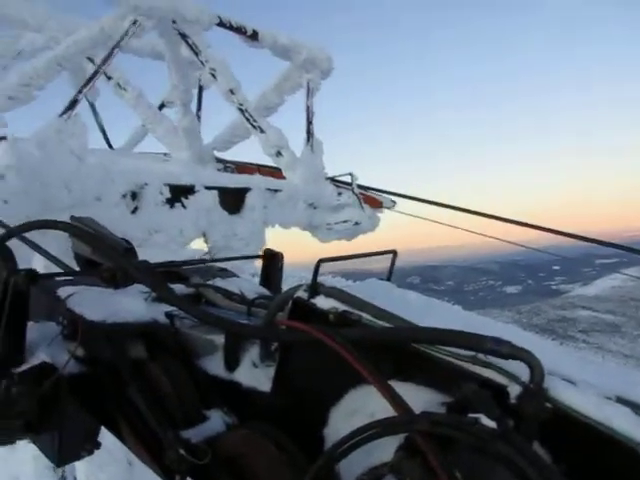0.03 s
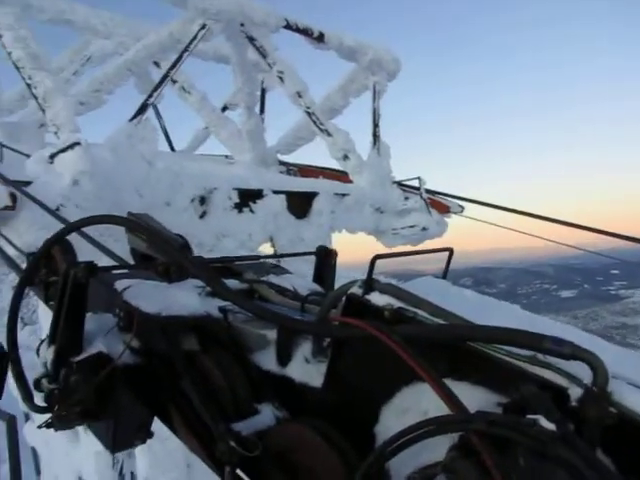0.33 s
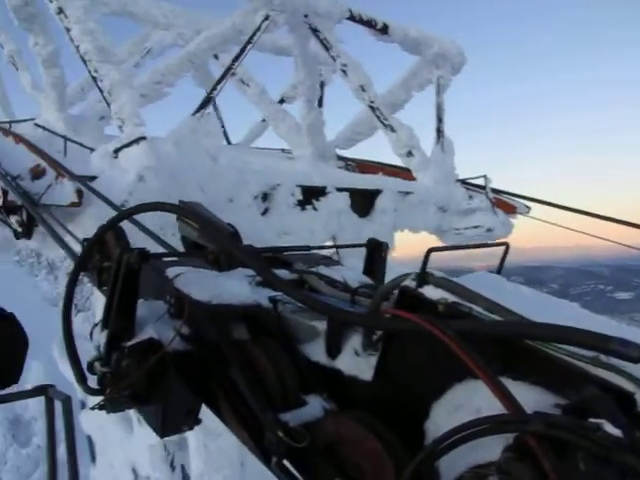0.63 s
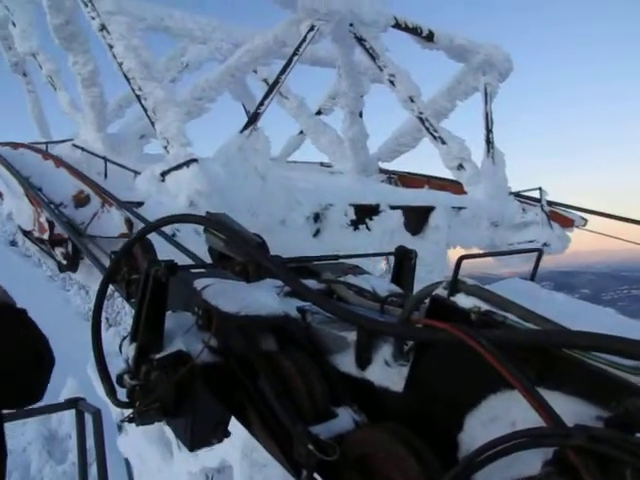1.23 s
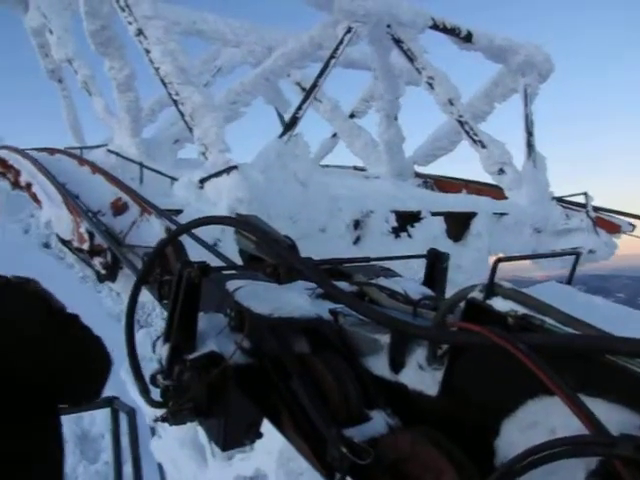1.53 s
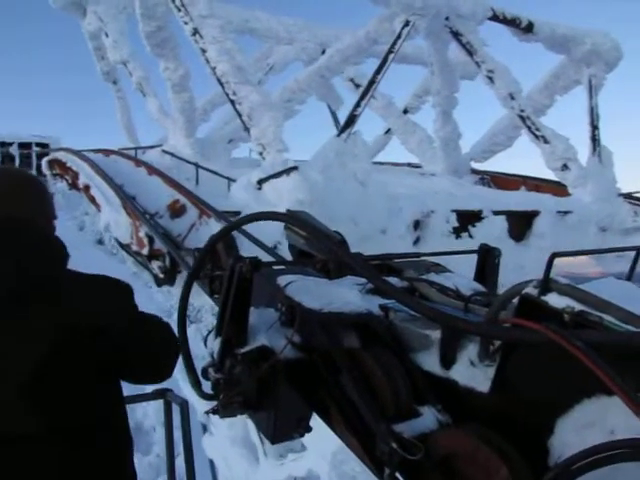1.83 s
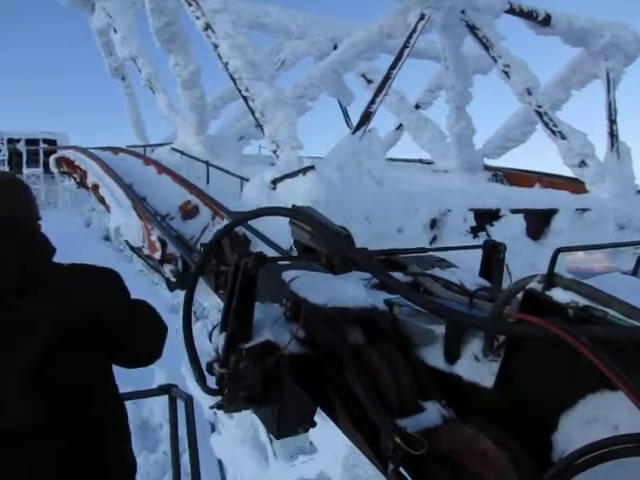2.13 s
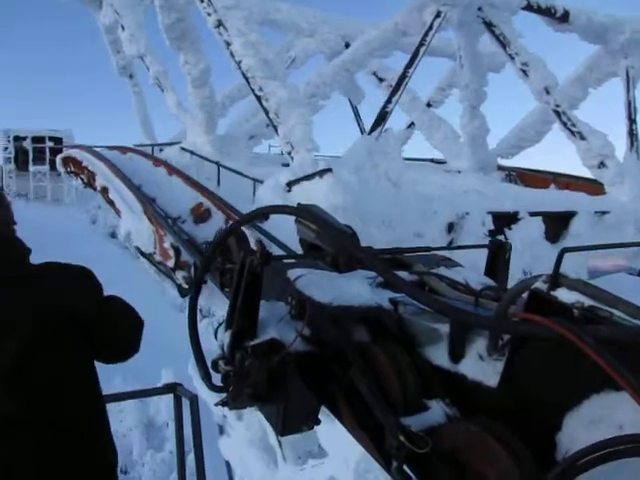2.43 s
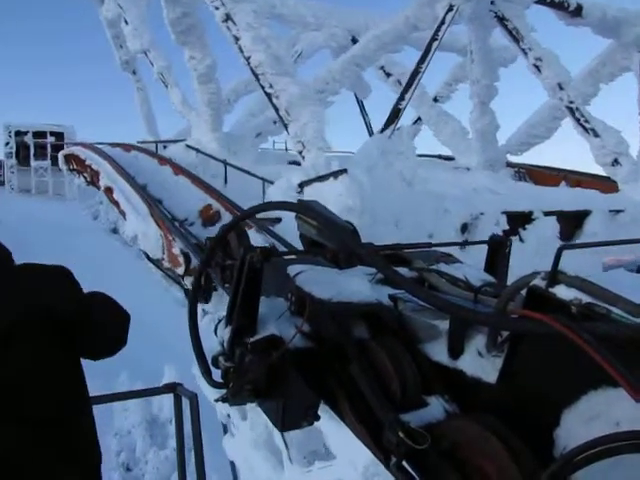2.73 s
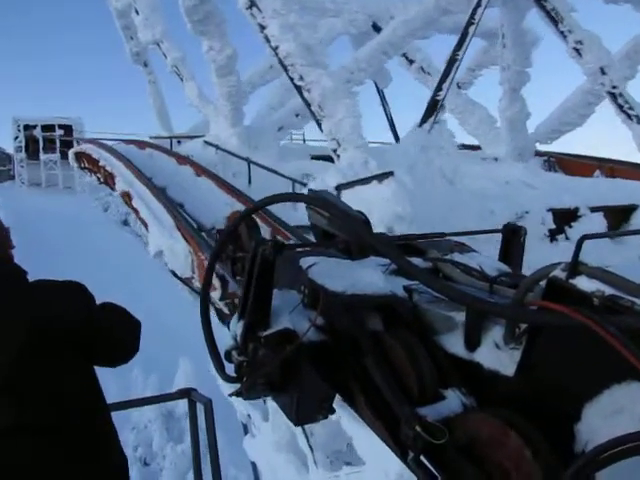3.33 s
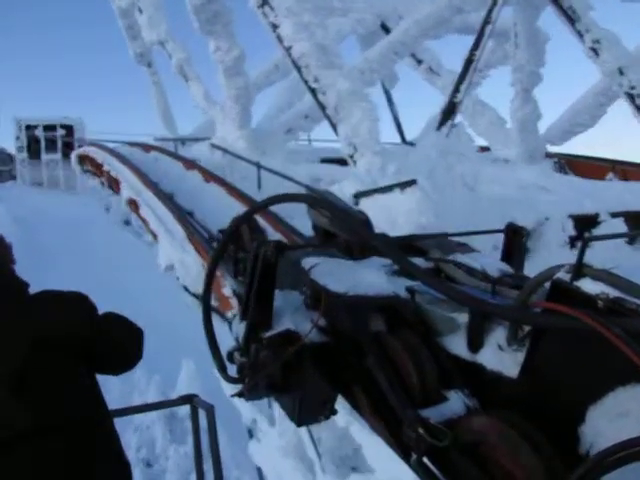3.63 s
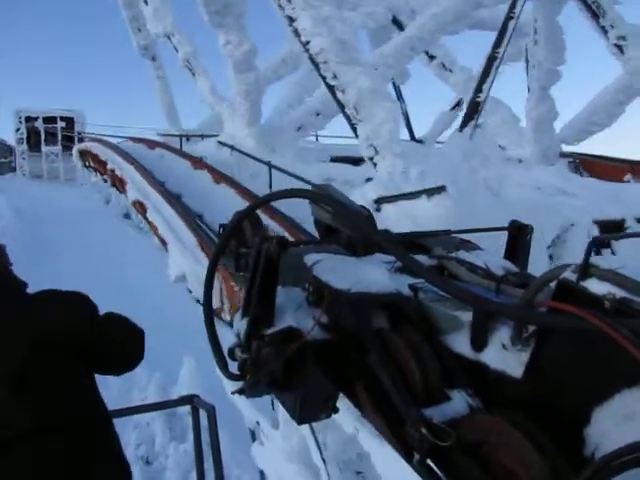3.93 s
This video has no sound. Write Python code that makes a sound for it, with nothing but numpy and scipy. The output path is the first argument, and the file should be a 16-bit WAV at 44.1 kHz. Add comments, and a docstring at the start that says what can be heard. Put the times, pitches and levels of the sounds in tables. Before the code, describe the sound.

Frozen cable car machinery squeals in harsh repeated strokes over low rumbling wind.

```python
"""Frozen cable car squealing in the wind

Frozen machinery squeals in repeated strokes: steel sticks and slips, and each slip rings the same
metal body. Fast slipping whistles cleanly; slow slipping under load turns into a rasp. Mountain wind
rumbles and thumps on the two microphone openings. Behind it are a fine sizzle, an icy hiss, brief
scrapes, steady air and a faint whine."""
import sys
import numpy as np
from scipy import signal
from scipy.fft import rfft, irfft
from scipy.io import wavfile
from scipy.ndimage import uniform_filter1d, minimum_filter1d

SR = 44100
rng = np.random.default_rng(int(sys.argv[2]) if len(sys.argv) > 2 else 0)


def file_out(sig):
    """Save sig as 16-bit WAV at sys.argv[1]."""
    # one column per channel
    cols = np.atleast_2d(sig).T
    # limit, then scale
    lim = np.clip(cols, -1, 1)
    pcm = np.round(lim * 32767).astype(np.int16)
    wavfile.write(sys.argv[1], SR, pcm)


N = 176400
T = np.arange(N) / SR
FREQ = np.arange(N // 2 + 1) * SR / N

# How the steel slips, one list for each squeal: time_s, slip_rate_hz, force_db
SQUEAL_STROKES = [
    [(0.002, 3600, -24), (0.022, 2116, -24.5), (0.027, 1384, -19.5), (0.043, 1530, -21.5),
     (0.07, 1503, -19.5), (0.08, 1626, -26), (0.095, 1456, -20), (0.108, 1540, -28), (0.118, 1844, -23),
     (0.133, 1630, -25), (0.141, 1284, -20.5), (0.155, 1346, -22), (0.162, 1190, -24), (0.18, 1490, -19.5),
     (0.192, 1084, -21), (0.2, 1490, -21), (0.213, 1240, -21), (0.224, 1280, -24), (0.234, 1720, -36)],
    [(0.332, 2870, -32), (0.346, 2105, -34), (0.359, 2240, -32), (0.371, 1295, -32.5), (0.384, 1620, -32)],
    [(0.393, 1800, -31), (0.404, 1256, -25.5), (0.42, 1310, -29.5), (0.43, 1040, -29.5), (0.45, 1780, -39)],
    [(0.463, 3510, -41.5), (0.481, 1967, -22), (0.498, 2116, -25.5), (0.523, 1736, -22), (0.543, 2150, -24),
     (0.563, 1760, -22.5), (0.569, 1470, -17.5), (0.583, 1357, -21.5), (0.587, 1955, -25),
     (0.602, 2000, -24.5), (0.62, 3000, -34)],
    [(0.908, 2847, -30), (0.925, 2140, -22), (0.938, 1147, -18.5), (0.95, 1023, -21), (0.963, 1097, -24),
     (0.98, 1065, -20), (1.01, 1210, -22), (1.022, 1116, -20.5), (1.045, 1126, -23), (1.058, 1334, -22.5),
     (1.08, 1165, -20), (1.087, 887, -23), (1.122, 910, -19), (1.133, 1090, -21.5), (1.146, 1057, -22),
     (1.15, 859, -23), (1.159, 788, -15), (1.163, 1105, -19.5), (1.18, 1060, -25), (1.184, 911, -17.5),
     (1.197, 963, -26.5), (1.215, 1607, -38)],
    [(1.34, 1974, -34), (1.362, 1556, -33), (1.383, 1454, -30.5), (1.398, 940, -31.5), (1.41, 1245, -30)],
    [(1.428, 1356, -31), (1.448, 852, -27.5), (1.462, 787, -21.5), (1.479, 722, -23.5), (1.489, 1017, -26),
     (1.508, 1780, -34)],
    [(1.538, 2130, -36.5), (1.558, 1293, -25), (1.586, 1337, -25.5), (1.623, 1061, -20.5),
     (1.657, 1370, -29.5), (1.677, 1081, -21.5), (1.695, 959, -25.5), (1.718, 835, -19),
     (1.742, 908, -21.5), (1.749, 1056, -25), (1.763, 1810, -30)],
    [(2.208, 1570, -38), (2.22, 1807, -36), (2.232, 1537, -25.5), (2.24, 1178, -26), (2.254, 1055, -23),
     (2.27, 890, -22.5), (2.287, 750, -21.5), (2.318, 706, -22.5), (2.365, 792, -23), (2.4, 770, -23),
     (2.43, 903, -25), (2.455, 798, -20.5), (2.47, 646, -21.5), (2.49, 717, -22), (2.51, 651, -19),
     (2.532, 703, -20), (2.562, 610, -20), (2.568, 850, -20), (2.595, 721, -21), (2.61, 792, -28),
     (2.63, 1285, -36)],
    [(2.765, 2360, -41), (2.785, 1625, -34), (2.806, 1264, -32.5), (2.82, 1353, -30), (2.836, 822, -33),
     (2.853, 1080, -30)],
    [(2.866, 1258, -29.5), (2.888, 802, -25.5), (2.906, 771, -21), (2.92, 726, -23.5), (2.93, 1180, -27),
     (2.95, 1650, -39)],
    [(2.976, 2290, -37), (2.997, 1344, -23.5), (3.021, 1515, -25.5), (3.035, 1364, -26), (3.056, 1211, -24),
     (3.085, 1642, -23.5), (3.104, 1298, -26.5), (3.118, 1185, -17.5), (3.138, 1038, -21),
     (3.16, 1170, -22), (3.178, 2175, -41)],
    [(3.533, 2266, -42), (3.543, 2415, -26), (3.552, 2120, -28), (3.558, 1690, -21), (3.57, 1057, -24.5),
     (3.585, 946, -17.5), (3.591, 1160, -23), (3.597, 1001, -25), (3.62, 975, -22), (3.655, 1040, -25),
     (3.677, 937, -26), (3.707, 1144, -22), (3.731, 960, -25), (3.736, 820, -19), (3.76, 914, -21.5),
     (3.793, 763, -21), (3.815, 870, -19), (3.821, 1106, -22), (3.833, 1091, -22), (3.838, 820, -19.5),
     (3.858, 1074, -31)],
]
def squeals():
    """The slips ring the steel, the contact grinds, and the frame scatters the ringing."""
    pulses, force = sum(np.array(stick_slip(stroke)) for stroke in SQUEAL_STROKES)
    ringing = steel_ring(pulses)
    grind = undb(-31.5) * force * unit(band(rng.standard_normal((2, N)), hz=9700, width_hz=2600))
    return ringing + grind + undb(-10.5) * frame_echo(ringing)


def stick_slip(stroke, clean_hz=1146, rasp_hz=587, attack_s=.003, release_s=.004):
    """Steel grips and lets go, one pulse a slip. Gives the pulses and the force of one squeal."""
    times, rate_hz, force_db = np.array(stroke).T
    rate = np.interp(T, times, rate_hz) * (1 + .0152 * wander(170))
    level_db = np.interp(T, times, force_db)
    gate = np.clip((T - times[0]) / attack_s + 1, 0, 1) * np.clip((times[-1] - T) / release_s + 1, 0, 1)
    force = gate * undb(level_db)
    sounding = np.flatnonzero(gate)
    slips_so_far = np.cumsum(rate[sounding]) / SR
    at = np.interp(np.arange(1, slips_so_far[-1]), slips_so_far, sounding)  # slip times, in samples
    sample = at.astype(int)
    period = SR / rate[sample]
    # Slow slipping or a loose contact makes the timing and strength uneven.
    slowness = np.clip((clean_hz - rate) / (clean_hz - rasp_hz), 0, 1)
    looseness = np.clip((-27 - level_db) / 7, 0, 1)
    rasp = np.maximum(slowness, looseness)[sample]
    jitter, strength, shift = rng.standard_normal((3, len(at)))
    at = at + jitter * period * (.003 + .011 * rasp)
    snag = rng.random(len(at)) < 70 * (.1 + rasp) / rate[sample]  # a snag breaks the rhythm
    at = at + np.cumsum(snag * shift * .28 * period)
    size = force[sample] * np.sqrt(period) * undb(.7 * (2 + rasp) * strength)
    alternate = (-1) ** np.arange(len(at))  # rough slips fall into strong-weak pairs now and then
    size = size * (1 + alternate * np.clip(.2 * rasp * wander(45)[sample], -1, 1))
    pulses = slip_pulses(at, size, period)
    dull = signal.sosfiltfilt(signal.butter(2, 6300, fs=SR, output="sos"), pulses)
    grit = undb(-46) * force * rng.standard_normal(N)
    return pulses + slowness * (dull - pulses) + grit, force  # slow slips lose their treble


def slip_pulses(at, size, period, lost_share=.35):
    """Each slip is a sharp click; the row of clicks loses a share of its lowest tone."""
    taps = at.astype(int)[:, None] + np.arange(-7, 9)
    offset = taps - at[:, None]
    click = np.sinc(offset) * np.sinc(offset / 8)  # lets a click fall between two samples
    pulses = np.bincount(np.clip(taps, 0, N - 1).ravel(), (size[:, None] * click).ravel(), N)
    cycle = np.interp(T * SR, at, np.arange(len(at)))
    lowest_tone = 2 * np.interp(T * SR, at, size / period, left=0, right=0) * np.cos(2 * np.pi * cycle)
    return pulses - lost_share * lowest_tone


# The pitches at which the steel rings: pitch_hz, width_hz, left_db, right_db
STEEL_RINGS = [(2202, 74, -33, -23), (2394, 630, -16, -14), (3060, 110, -18.5, -22.5),
               (3400, 413, -6, -11.5), (4258, 256, -1.5, -3), (4930, 95, -18.5, -9.5),
               (5665, 190, -25, -14), (6240, 230, -17.5, -16)]
# Boost or cut of the strongest ring, which weakens in the last squeal: time_s, gain_db
MAIN_RING_GAIN = [(3.2, 1), (3.55, -5.5)]
def steel_ring(pulses, left_delay_s=.00003, high_cut_hz=8000, low_cut_hz=2150, gain_db=11):
    """The steel rings with every pulse and gives off little sound below its lowest ring."""
    body = sum(resonance(hz, width) * undb([[left], [right]]) for hz, width, left, right in STEEL_RINGS)
    delay = np.exp(-2j * np.pi * FREQ * np.array([[left_delay_s], [0]]))
    ring = irfft(rfft(pulses) * body * delay / (1 + (FREQ / high_cut_hz) ** 6), N)
    ring = ring + (undb(curve(MAIN_RING_GAIN)) - 1) * band(ring, hz=4260, width_hz=710)
    return undb(gain_db) * signal.sosfilt(signal.butter(4, low_cut_hz, "high", fs=SR, output="sos"), ring)


def frame_echo(sound, fade_60_db_s=.11):
    """The frame scatters the sound into a short, smooth echo."""
    tail = rng.standard_normal((2, N // 8)) * np.exp(-np.log(1000) * T[:N // 8] / fade_60_db_s)
    tail = tail / np.sqrt(np.sum(tail ** 2, axis=1, keepdims=True))
    return signal.fftconvolve(sound, tail, axes=1)[:, :N]


# Tone of the wind's rumble: pitch_hz, relative_db
WIND_TONE = [(12, -26), (20, -1), (43, 2), (77, -2.5), (143, -8.5), (594, -35.5), (1200, -52), (1560, -120)]
# Strength of the wind: time_s, relative_db
WIND_STRENGTH = [(0, 1.5), (1.6, 1), (2.15, 0.5), (3.2, 4), (4, 2.5)]
# Gusts that swell and fade: peak_s, length_s, left_db, right_db
GUSTS = [(0.93, 0.25, -20, -26.5), (1.11, 0.1, -23.5, -14), (1.55, 0.16, -19, -20.5),
         (1.915, 0.064, -18.5, -16.5), (3.173, 0.057, -19, -21)]
# Tone of a gust: pitch_hz, relative_db
GUST_TONE = [(30, -11), (75, -0.5), (170, -4.5), (600, -31), (3000, -54)]
def wind(left_db=-16, right_db=-18.5, eddy_db=3.5, deep_hz=130):
    """Swirling air rumbles on each microphone opening; eddies stir its upper part, and gusts swell."""
    strength = curve(WIND_STRENGTH)
    flow = noise(WIND_TONE)
    deep = irfft(rfft(flow) / (1 + (FREQ / deep_hz) ** 4), N)
    eddies = np.array([wander(21.75) for _ in range(2)])
    upper = (flow - deep) * undb(eddy_db * eddies - 2.5)
    rumble = (deep + upper) * undb(strength - strength.mean())
    gusts = sum(swell(at, length) * undb([[left], [right]]) for at, length, left, right in GUSTS)
    return rumble * undb([[left_db], [right_db]]) + gusts * noise(GUST_TONE)


# Sharp eddies that hit the microphone: time_s, left_db, right_db
WIND_THUMPS = [(0.447, -11, -10), (1.773, 0.5, -33), (1.898, -8, -24), (1.908, -21, -3.5),
               (3.271, -9.5, -8.5), (3.297, -5.5, -8.5), (3.856, -10, 0.5)]
def wind_thumps(pitch_hz=62, flip_s=.0009, decay_s=.007, flurry_s=.017):
    """Each eddy pushes on the openings, flips to suction and dies away in a flurry of rough air."""
    out, rough_air = 0, noise(GUST_TONE)
    for at, left, right in WIND_THUMPS:
        t = T - at
        swing = -np.tanh(t / flip_s) * np.cos(2 * np.pi * pitch_hz * t) * np.exp(-abs(t) / decay_s)
        flurry = undb(-15) * rough_air * np.exp(-(t / flurry_s) ** 2)
        out = out + (swing + flurry) * undb([[left], [right]])
    return out


# The rings that colour the sizzle: pitch_hz, width_hz, relative_db
SIZZLE_RINGS = [(4960, 290, -5), (6910, 1670, 2), (10370, 950, -10.5)]
# Loudness of the sizzle: time_s, level_db
SIZZLE_LEVEL = [(.2, -53), (1.3, -48.5), (2.7, -47.5), (3.6, -50)]
def sizzle(chirps_per_s=480, from_hz=3000, to_hz=13000, typical_s=.012, scatter_db=3):
    """Tiny rising chirps at random moments, perhaps from ice on the running cable."""
    out = np.zeros((2, N + SR))
    for when, stretch, right_phase in rng.random((int(chirps_per_s * N / SR), 3)):
        progress = np.linspace(0, 1, int(typical_s * (.5 + stretch) * SR))
        phase = np.cumsum(from_hz + (to_hz - from_hz) * progress) / SR + np.array([[0], [right_phase]])
        start = int(when * N)
        size = undb(scatter_db * np.clip(rng.standard_normal((2, 1)), -2, 2))
        out[:, start:start + len(progress)] += size * np.sin(np.pi * progress) * np.sin(2 * np.pi * phase)
    colour = sum(undb(db) * abs(resonance(hz, width)) ** 2 for hz, width, db in SIZZLE_RINGS)
    return undb(curve(SIZZLE_LEVEL)) * unit(irfft(rfft(out[:, :N]) * colour, N))


# Tone of the hiss: pitch_hz, relative_db
HISS_TONE = [(3000, -4), (6500, 2.5), (8700, -1), (10800, 0), (15500, -9)]
# How the hiss rises and falls: time_s, relative_db
HISS_SWELLS = [(0, -45), (.43, -54), (.56, -45), (.79, -50), (.95, -44), (1.52, -51), (1.72, -47),
               (2.1, -53), (2.5, -48), (3.2, -50), (3.46, -53), (3.78, -46), (3.92, -53)]
def icy_hiss(gain_db=.5, flicker_db=1.57):
    """A high hiss that swells slowly and flickers quickly."""
    return noise(HISS_TONE, share=.14) * undb(gain_db + curve(HISS_SWELLS) + flicker_db * wander(90))


# Brief scrapes: peak_s, length_s, level_db
CRISP_SCRAPES = [(.65, .11, -52), (.7, .025, -48), (3.28, .02, -50), (3.32, .1, -53)]
def scrapes(crackle_db=3.5):
    """Short swells of bright, crackly noise that sound like dry snow."""
    bright = band(rng.standard_normal((2, N)), hz=12100, width_hz=3500)
    crackly = unit(bright * undb(crackle_db * wander(700)))
    return crackly * sum(undb(db) * swell(at, length) for at, length, db in CRISP_SCRAPES)


# Tone of the air and distant machinery: pitch_hz, relative_db
AIR_TONE = [(400, -2), (800, -5.5), (1400, -8), (2200, -14.5), (4000, -27.5), (15000, -52)]
def steady_air(level_db=-45.5):
    """Air and distant machinery blend into a soft, even rush."""
    return undb(level_db) * noise(AIR_TONE, share=.45)


def whine(pitch_hz=1498, level_db=-53.5, start_s=2.7, rise_s=.2):
    """A thin, slightly wavering tone that sets in late."""
    phase = np.cumsum(pitch_hz * (1 + .0012 * wander(24.9))) / SR
    return undb(level_db) * np.sin(2 * np.pi * phase) * np.clip((T - start_s) / rise_s, 0, 1)


def undb(db):
    """Turn decibels into a gain."""
    return 10 ** (np.asarray(db) / 20)


def unit(x):
    """Scale a sound to an average power of 1."""
    return x / np.sqrt(np.mean(x ** 2))


def curve(rows):
    """Join (time_s, value) rows by straight lines."""
    return np.interp(T, *np.array(rows).T)


def swell(peak_s, length_s):
    """A bell-shaped rise and fall."""
    return np.exp(-2 * ((T - peak_s) / length_s) ** 2)


def wander(steps_per_s):
    """Smooth random motion with a spread near 1."""
    hold = max(int(SR / steps_per_s), 1)
    steps = np.repeat(rng.standard_normal(N // 40), hold)[:N]
    return 1.56 * uniform_filter1d(uniform_filter1d(steps, hold), hold)


def noise(tone, share=0):
    """Stereo noise shaped by (pitch_hz, relative_db) rows; both sides have a share of it in common."""
    hz, db = np.array(tone).T
    octave = np.log2(FREQ + 1)
    octaves_outside = np.maximum(np.log2(hz[0]) - octave, 0) + np.maximum(octave - np.log2(hz[-1]), 0)
    gain = undb(np.interp(octave, np.log2(hz), db) - 20 * octaves_outside)
    white = rng.standard_normal((3, N))
    stereo = np.sqrt(1 - share) * white[:2] + np.sqrt(share) * white[2]
    return unit(irfft(rfft(stereo) * gain, N))


def resonance(hz, width_hz):
    """How one ring responds to each frequency, with gain 1 at its centre."""
    return 1j * FREQ * width_hz / (hz ** 2 - FREQ ** 2 + 1j * FREQ * width_hz)


def band(x, hz, width_hz):
    """Pass a sound through one resonance."""
    return irfft(rfft(x) * resonance(hz, width_hz), N)


def scene(fade_s=.005):
    """Machinery, wind and background at the microphone, with a very short fade at both ends."""
    mix = squeals() + wind() + wind_thumps() + sizzle() + icy_hiss() + scrapes() + steady_air() + whine()
    return mix * np.clip(np.minimum(T, T[-1] - T) / fade_s, 0, 1)


def record(dry, low_cut_hz=18, ceiling=.85, high_cut_hz=15700):
    """The recorder cuts the deepest rumble, turns the hardest gusts down and cuts the highest treble."""
    thinned = signal.sosfilt(signal.butter(2, low_cut_hz, "high", fs=SR, output="sos"), dry)
    needed_gain = ceiling / np.maximum(abs(thinned), ceiling)
    smooth_gain = uniform_filter1d(minimum_filter1d(needed_gain, size=401), size=401)
    return signal.sosfilt(signal.ellip(10, .2, 80, high_cut_hz, fs=SR, output="sos"), thinned * smooth_gain)


dry = scene()
out = record(dry)
file_out(out)
```